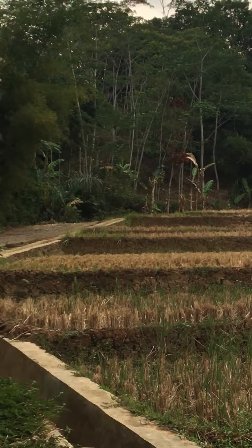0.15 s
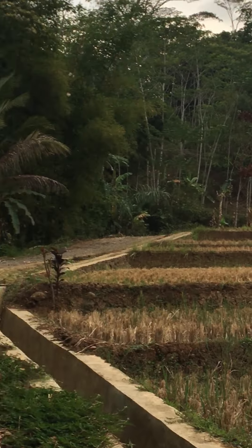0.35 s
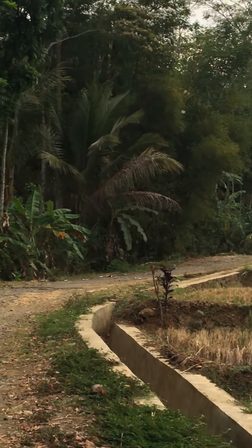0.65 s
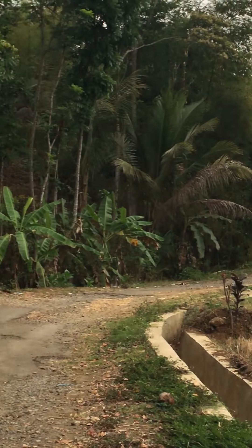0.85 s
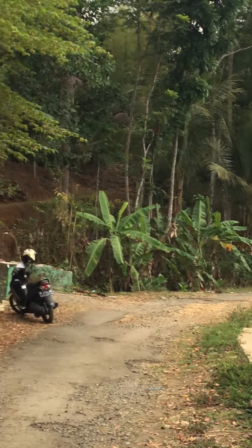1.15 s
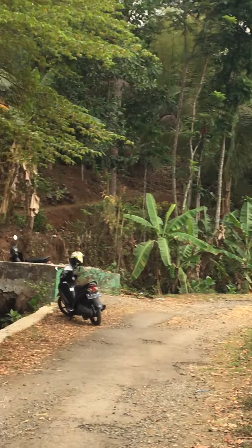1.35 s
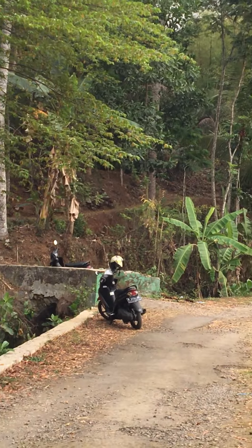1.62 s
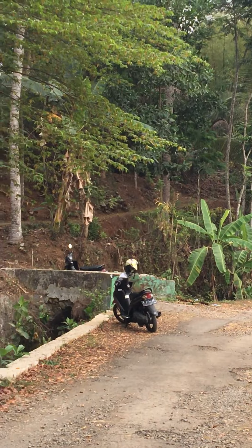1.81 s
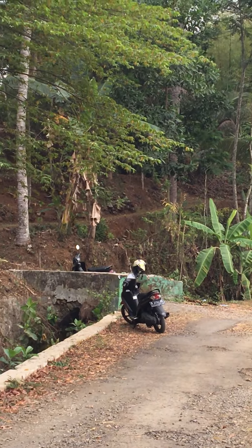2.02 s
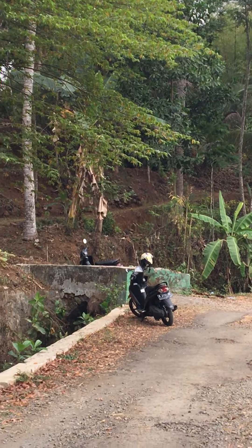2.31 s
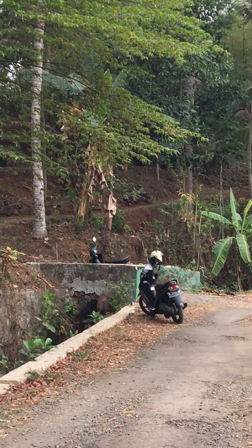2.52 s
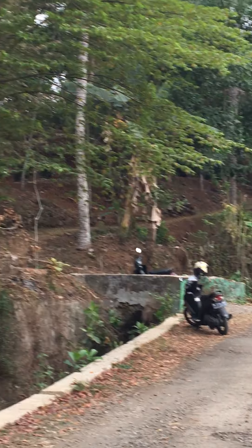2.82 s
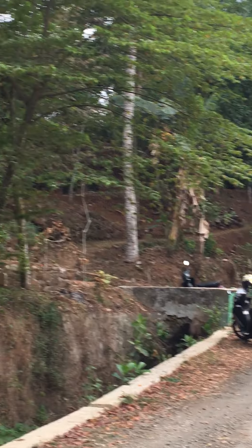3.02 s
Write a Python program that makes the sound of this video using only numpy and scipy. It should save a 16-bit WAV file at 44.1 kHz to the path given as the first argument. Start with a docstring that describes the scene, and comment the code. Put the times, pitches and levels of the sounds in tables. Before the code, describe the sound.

A small motorbike thumps steadily, slowing slightly, then its exhaust, clatter and tyre hiss swell as it draws level; leaves rustle and grit snaps close to a roadside microphone in an insect-filled wooded valley.

```python
"""A country road in a wooded valley, one microphone at the verge: a single-cylinder motorbike draws level.
Its intake thumps once a cycle as a slowing pressure swing; the exhaust pulses ring silencer resonances.
From about two seconds exhaust, engine clatter and tyre hiss swell in, the last two as coloured noise.
Cicadas buzz in the trees as throbbing narrow noise over low rumbling air; gliding tones whine and chirp.
Close by, dry leaves rustle as grainy noise, and grit and twigs snap as fast-fading bursts."""
import sys
import numpy as np
from scipy import signal
from scipy.fft import rfft, irfft
from scipy.io import wavfile

SR = 44100
rng = np.random.default_rng(int(sys.argv[2]) if len(sys.argv) > 2 else 0)


def store_wav(level_fs):
    """Save 16-bit WAV to argv[1]."""
    pcm = np.round(np.clip(np.atleast_2d(level_fs), -1, 1) * 32767)
    wavfile.write(sys.argv[1], SR, pcm.T.astype(np.int16))


N = 139356
TIME = np.arange(N) / SR  # s
FREQS = np.arange(N // 2 + 1) * SR / N + 1e-3  # Hz, nudged off zero

# Colour tables are relative: the noise is brought to unit level before its own level is applied.
# still air of the valley: f/Hz, density/dB
AIR_COLOUR = [(20, 19), (50, 0), (150, 2), (400, -14.5), (900, -16), (2000, -19.5), (2800, -24.5),
              (3300, -19.5), (5000, -29), (8000, -34.5), (11000, -93), (15500, -96)]
AIR_DB = -50

# cicada in the trees
CICADA_HZ, CICADA_WIDTH_HZ, CICADA_DB = 9380, 1050, -64
CICADA_BUZZ_HZ, CICADA_THROB_HZ = 132, 9.2
# a second insect's trills: start t/s, end t/s, f/Hz, level/dB
TRILLS = [(0, .47, 7570, -74), (1.17, 1.655, 7660, -69.5)]
TRILL_WIDTH_HZ, TRILL_ATTACK_S, TRILL_RELEASE_S = 340, .092, .015

# engine speed: t/s, rate/firings per second
FIRING_RATE = [(0.0, 32.45), (0.3, 31.15), (0.6, 29.76), (0.85, 28.74), (1.05, 27.29), (1.35, 26.81),
               (1.6, 25.48), (1.8, 25.29), (2.0, 25.15), (2.2, 26.86), (2.45, 26.95), (2.75, 27.61),
               (2.9, 27.02), (3.16, 25.34)]
FIRST_GULP_S, FIRING_SCATTER_DB = .0148, .59
PHASE_WOBBLE = .003  # cycles

# intake thump: t/s, level/dB
INTAKE_LEVEL = [(0, -31.5), (.5, -30), (1.05, -26.5), (1.65, -25.5), (2.0, -28.5), (2.3, -28), (2.7, -24),
                (3.16, -21)]
GULP_SWINGS, GULP_SAG = 4.04, .92  # pressure swings per cycle; how fast they slow down
GULP_RISE, GULP_FALL = .18, .25  # cycles
TRACT = (233, 69, -13)  # intake tract resonance: f/Hz, width/Hz, level/dB against the gulp
VALVE_LEAD = .1476  # cycles before the gulp

# exhaust: t/s, level/dB, added to that of each silencer resonance
EXHAUST_LEVEL = [(0, -28), (1.6, -41), (1.9, -14), (2.15, -4), (2.6, -0.5), (3.16, 1)]
# silencer resonances: f/Hz, width/Hz, level/dB
SILENCER_MODES = [(52.8, 13.1, -28.5), (137.7, 30, -31.5), (202, 32, -37.5), (361, 73, -44)]
EXHAUST_LEAD = .525  # cycles ahead of the intake

# gas rush of each firing: f/Hz, density/dB
GAS_COLOUR = [(25, -15), (60, 1.5), (120, -10.5), (200, 4), (290, -7), (370, -11), (440, -14.5), (560, -15),
              (900, -40)]
# gas rush: t/s, level/dB
GAS_LEVEL = [(0, -48.5), (1.6, -47), (1.9, -45.5), (2.15, -46.5), (2.7, -43), (3.16, -40)]

# engine and drive clatter: f/Hz, density/dB
CLATTER_COLOUR = [(300, 5), (400, -8.5), (470, -4), (560, -2), (700, -1.5), (860, -3), (1100, 0.5),
                  (1400, 0.5), (1700, -3), (2100, -4.5), (2600, -13), (3300, -12)]
# clatter: t/s, level/dB
CLATTER_LEVEL = [(0, -63.5), (.65, -58), (.85, -54), (1.15, -55), (1.65, -58.5), (1.9, -53.5), (2.2, -54),
                 (2.45, -48), (2.62, -45.5), (2.78, -42.5), (2.92, -40.5), (3.16, -41.5)]
# ringing of the engine casing, heard once the bike is close: f/Hz, width/Hz, level/dB
CASING_MODES = [(1301, 95, -2.5), (1470, 106, -3), (1610, 77, -2), (1725, 105, 0.5), (1967, 65, -6.5),
                (2310, 210, -8)]
# casing: t/s, level/dB, added to that of each resonance
CASING_LEVEL = [(2.1, -90), (2.4, -65), (2.62, -55.5), (2.78, -56.5), (2.92, -48), (3.16, -43.5)]

# tyre and belt hiss: f/Hz, density/dB
HISS_COLOUR = [(1470, -36), (2500, 2.5), (2740, -6), (3450, 0), (4340, 0), (4790, -5.5), (5500, -0.5),
               (6410, -1.5), (7530, -7), (8780, -3), (10500, -12), (12000, -9), (15600, -14)]
# hiss: t/s, level/dB
HISS_LEVEL = [(0, -69.5), (1.7, -66.5), (2.4, -62.5), (2.62, -58), (2.76, -50), (2.92, -44.5), (3.05, -42),
              (3.16, -40)]

# leaf rustles close by: centre t/s, half length t/s, level/dB
RUSTLES = [(0.054, 0.061, -55), (0.218, 0.048, -60.5), (0.343, .026, -52.5), (0.348, 0.0022, -48.5),
           (0.54, 0.024, -60.5), (0.737, 0.022, -62), (1.554, 0.033, -61)]
# dry leaf noise: f/Hz, density/dB
LEAF_COLOUR = [(600, 8), (1500, 5), (2300, 9.5), (3000, 5), (4000, -0.5), (7500, 0), (11000, -7),
               (15500, -8.5)]
# snaps of grit and twigs: t/s, level/dB, ring f/Hz
SNAPS = [(.135, -54, 9000), (.406, -55, 3300), (.526, -41, 3200), (.694, -57, 7000), (.837, -56, 5300),
         (.8905, -39.5, 4200), (.948, -52, 4200)]
SNAP_DECAY_S, SNAP_TAIL_S, SNAP_TAIL_DB = .0018, .016, -20
GRIT_PER_S, GRIT_DB, GRIT_UNTIL_S = 45, -69, 1.0  # fine ticks between the snaps

# a faint rising chirp far off: t/s, f/Hz, level/dB
CHIRP = [(.08, 1750, -80), (.14, 1850, -63), (.21, 2020, -56), (.26, 2080, -80)]
# faint drive whine, lower tone: t/s, f/Hz, level/dB
WHINE_LOW = [(.7, 1400, -80), (.85, 1480, -69), (1.0, 1530, -66), (1.38, 1510, -62), (1.48, 1445, -62),
             (1.75, 1440, -65), (2.3, 1420, -76)]
# faint drive whine, upper tone: t/s, f/Hz, level/dB
WHINE_HIGH = [(.72, 1720, -80), (.8, 1820, -62), (.9, 1915, -59), (1.15, 1935, -65), (1.4, 1900, -79)]
WHISTLE_WAVER = .008  # share of the pitch

# hollow rasp of the silencer as the throttle opens: t/s, level/dB
RASP_LEVEL = [(1.75, -62), (1.9, -58.5), (2.15, -50), (2.4, -51), (2.6, -51.5), (3.16, -45.5)]
RASP_HZ, RASP_WIDTH_HZ = 367, 95

LOW_CUT_HZ, TOP_HZ = 36.8, 15600  # microphone range


def undb(db):
    """Decibels to gain."""
    return 10 ** (np.asarray(db) / 20)


def curve(rows, axis=1):
    """One column of a table, joined by straight lines in time."""
    rows = np.array(rows)
    return np.interp(TIME, rows[:, 0], rows[:, axis])


def noise(gain):
    """Noise of unit level with the given gain at each frequency."""
    x = irfft(rfft(rng.standard_normal(N)) * gain, N)
    return x / x.std()


def colour(points):
    """Noise through (f/Hz, density/dB) points, falling steeply beyond the ends."""
    hz, db = np.array(points).T
    skirts = np.minimum(1, np.minimum(FREQS / hz[0], hz[-1] / FREQS)) ** 6
    outline = np.interp(np.log(FREQS), np.log(hz), db)
    return noise(undb(outline) * skirts)


def band(hz, width_hz):
    """Noise through the same resonance twice."""
    detuning = (FREQS ** 2 - hz ** 2) / (FREQS * width_hz)
    return noise(1 / (1 + detuning ** 2))


def walk(rate_hz):
    """Random drift of unit spread, slower for a lower rate."""
    return noise(np.exp(-(FREQS / rate_hz) ** 2))


def throb(cycle, depth, at):
    """A gain that swings once a cycle, highest at the given place in it."""
    return 1 + depth * np.cos(2 * np.pi * (cycle - at))


def valve(cycle):
    """One pulse at the start of each cycle."""
    turns = np.floor(cycle)
    return np.diff(turns, prepend=turns[0])


def ring(pulses, hz, width, db):
    """Pulses strike one resonance; a wider one dies away sooner."""
    decay = np.exp(-np.pi * width * TIME)
    response = decay * np.sin(2 * np.pi * hz * TIME)
    return signal.fftconvolve(pulses, response)[:N] * undb(db)


def whistle(rows, width_hz):
    """A thin gliding tone that wavers in pitch, partly clean and partly rough."""
    pitch = curve(rows) * (1 + WHISTLE_WAVER * walk(15.4))
    phase = 2 * np.pi * np.cumsum(pitch) / SR
    tone = (1 + .5 * walk(width_hz)) * np.cos(phase) + .5 * walk(width_hz) * np.sin(phase)
    return tone * undb(curve(rows, axis=2))


def valley_air():
    """Low rumbling air: coloured noise whose level drifts a little."""
    return colour(AIR_COLOUR) * undb(AIR_DB + .5 * walk(8.3))


def cicada():
    """A narrow band of noise with a fast buzz and a slower throb, both slightly uneven."""
    buzz = throb(CICADA_BUZZ_HZ * TIME + .53 * walk(6), depth=.27, at=0)
    pulse = throb(CICADA_THROB_HZ * TIME + .44 * walk(1.1), depth=.2, at=0)
    return band(CICADA_HZ, CICADA_WIDTH_HZ) * buzz * pulse * undb(CICADA_DB)


def trills():
    """A thinner insect comes and goes: narrow noise that fades in and stops more quickly."""
    out = np.zeros(N)
    for start, end, hz, db in TRILLS:
        attack = (TIME - start) / TRILL_ATTACK_S
        release = (end - TIME) / TRILL_RELEASE_S
        fade = np.clip(np.minimum(attack, release), 0, 1)
        out += band(hz, TRILL_WIDTH_HZ) * undb(db) * fade
    return out


def intake(cycle, strength):
    """The valve opens on the tract, then a short, slowing pressure swing as the piston gulps air."""
    within = (cycle + .5) % 1 - .5  # cycles from the middle of the gulp
    swing = -np.cos(2 * np.pi * within * (GULP_SWINGS - GULP_SAG * within))
    half_length = np.where(within < 0, GULP_RISE, GULP_FALL)
    gulp = swing * np.exp(-np.abs(within / half_length) ** 1.89)
    tract = ring(valve(cycle + VALVE_LEAD), *TRACT)
    return (gulp + tract) * strength * undb(curve(INTAKE_LEVEL))


def exhaust(cycle, strength):
    """Each opening of the exhaust valve rings the silencer, its upper two resonances inverted."""
    pulses = valve(cycle + EXHAUST_LEAD) * strength
    rings = sum(sign * ring(pulses, *mode) for sign, mode in zip((1, 1, -1, -1), SILENCER_MODES))
    return rings * undb(curve(EXHAUST_LEVEL))


def gas_rush(cycle):
    """Turbulent gas: low coloured noise surging once a cycle."""
    return colour(GAS_COLOUR) * throb(cycle, depth=.42, at=-.093) * undb(curve(GAS_LEVEL))


def clatter(cycle):
    """Engine and drive noise with the ringing casing, swinging with the cycle and flickering in level."""
    casing = sum(band(hz, width) * undb(db) for hz, width, db in CASING_MODES)
    metal = colour(CLATTER_COLOUR) * undb(curve(CLATTER_LEVEL)) + casing * undb(curve(CASING_LEVEL))
    return metal * throb(cycle, depth=.073, at=-.23) * undb(1.5 * walk(220))


def tyre_hiss(cycle):
    """Tyre and belt hiss: high coloured noise, fluttering and swinging once a cycle."""
    level = curve(HISS_LEVEL) + 1.03 * walk(350)
    return colour(HISS_COLOUR) * throb(cycle, depth=.12, at=-.045) * undb(level)


def leaf_rustles():
    """Dry leaves close to the microphone: grainy noise in short swells."""
    swell = sum(undb(db) * np.exp(-((TIME - at) / half) ** 2 / 2) for at, half, db in RUSTLES)
    return colour(LEAF_COLOUR) * swell * undb(2.4 * walk(670))


def grit_ticks():
    """Fine ticks at random moments and strengths, each a fast-fading speck of bright noise."""
    chosen = (rng.random(N) < GRIT_PER_S / SR) * (TIME < GRIT_UNTIL_S)
    ticks = chosen * (1 + rng.exponential(size=N))
    fades = signal.fftconvolve(ticks, np.exp(-TIME / SNAP_DECAY_S))[:N]
    return fades * band(8000, 12000) * undb(GRIT_DB)


def far_chirp():
    """A faint tone gliding upwards, far off."""
    return whistle(CHIRP, width_hz=46)


def snaps():
    """Grit and twigs snap close by: a sudden burst of noise with a fast decay and a faint short tail."""
    out = np.zeros(N)
    for at, db, hz in SNAPS:
        age = np.maximum(TIME - at, 0)
        fade = np.exp(-age / SNAP_DECAY_S) + undb(SNAP_TAIL_DB) * np.exp(-age / SNAP_TAIL_S)
        crack = .7 * band(hz, .7 * hz) + .6 * colour(LEAF_COLOUR)
        out += crack * fade * (TIME >= at) * undb(db)
    return out


def drive_whine():
    """Two thin gliding tones from the drive."""
    return whistle(WHINE_LOW, width_hz=30) + whistle(WHINE_HIGH, width_hz=8.3)


def silencer_rasp(cycle):
    """One hollow silencer resonance filled with noise that swings once a cycle."""
    return band(RASP_HZ, RASP_WIDTH_HZ) * throb(cycle, depth=.41, at=-.5) * undb(curve(RASP_LEVEL))


def motorbike():
    """One engine cycle times the thumps, exhaust, gas, rasp, clatter and hiss; the whine glides by itself."""
    rate = curve(FIRING_RATE)
    cycle = np.cumsum(rate) / SR - FIRST_GULP_S * rate[0] + PHASE_WOBBLE * walk(11)
    strength = undb(FIRING_SCATTER_DB * walk(25))
    pulses = intake(cycle, strength) + exhaust(cycle, strength)
    rushes = gas_rush(cycle) + silencer_rasp(cycle)
    return pulses + rushes + clatter(cycle) + tyre_hiss(cycle) + drive_whine()


def scene():
    """The bike, the insects, the leaves and grit, and a far chirp in open air."""
    insects = cicada() + trills()
    ground = leaf_rustles() + grit_ticks() + snaps()
    return (valley_air() + insects + motorbike() + ground + far_chirp())[None]


def record(dry):
    """The microphone drops the deepest bass and cuts the top steeply."""
    bass_cut = 1 / (1 + (LOW_CUT_HZ / FREQS) ** 8)
    thinned = irfft(rfft(dry) * bass_cut, N)
    top_cut = signal.ellip(10, .2, 80, TOP_HZ, fs=SR, output="sos")
    return signal.sosfilt(top_cut, thinned)


dry = scene()
out = record(dry)
store_wav(out)
```